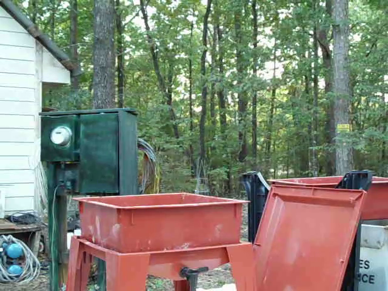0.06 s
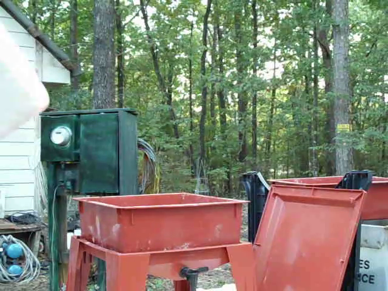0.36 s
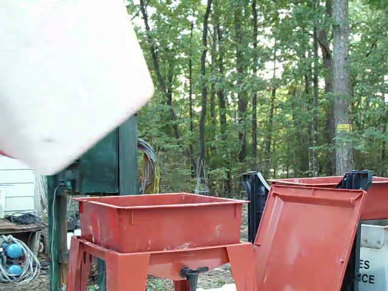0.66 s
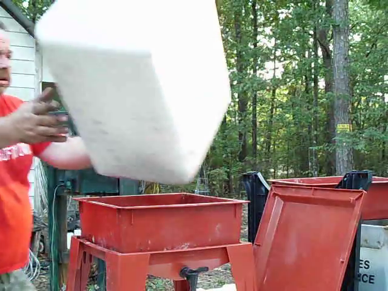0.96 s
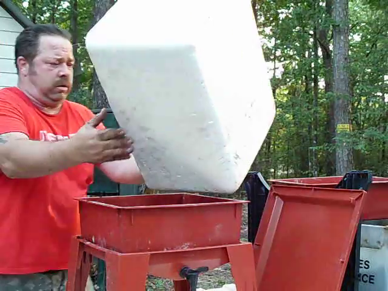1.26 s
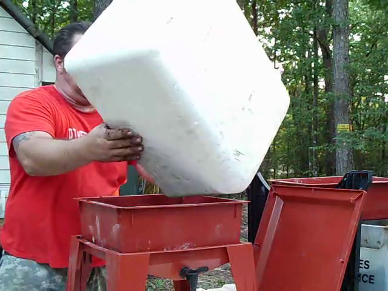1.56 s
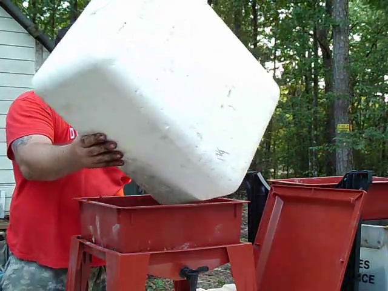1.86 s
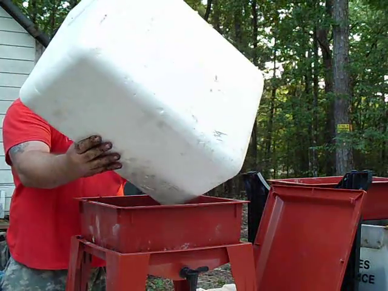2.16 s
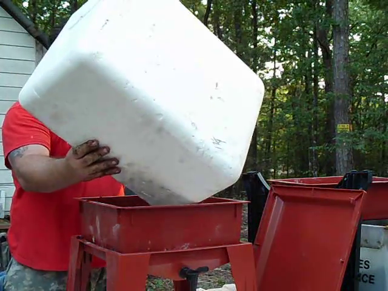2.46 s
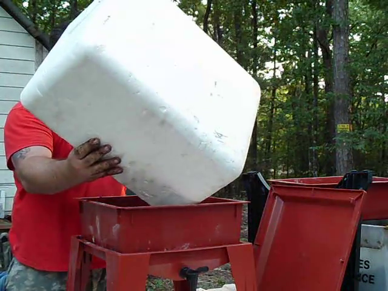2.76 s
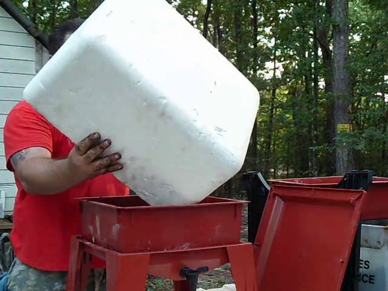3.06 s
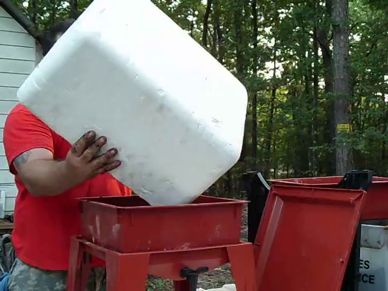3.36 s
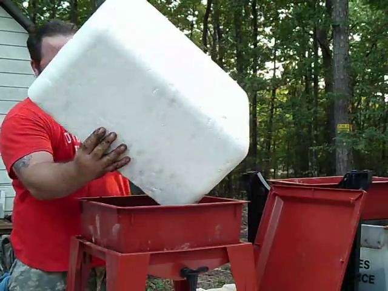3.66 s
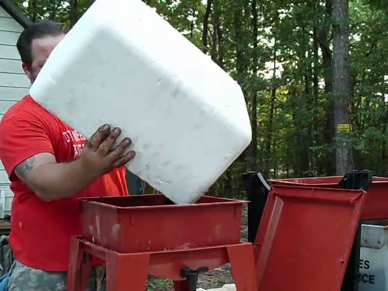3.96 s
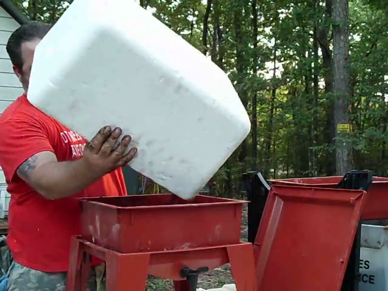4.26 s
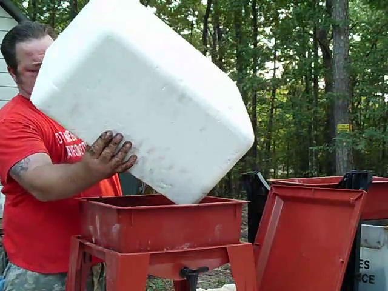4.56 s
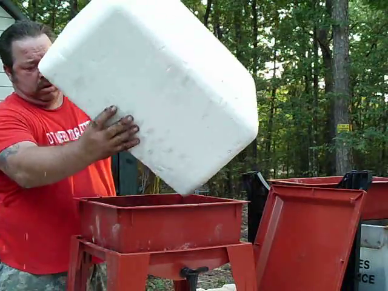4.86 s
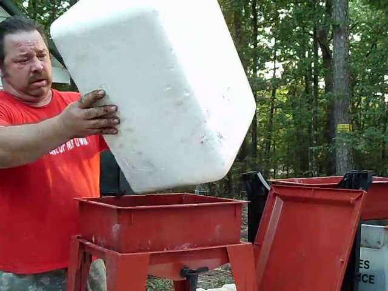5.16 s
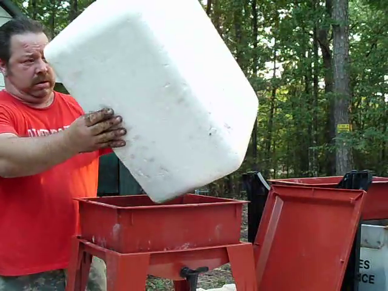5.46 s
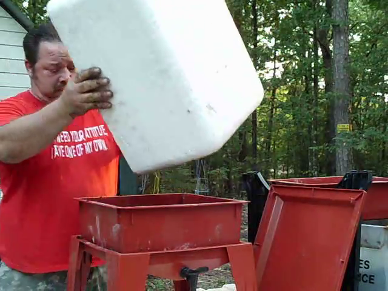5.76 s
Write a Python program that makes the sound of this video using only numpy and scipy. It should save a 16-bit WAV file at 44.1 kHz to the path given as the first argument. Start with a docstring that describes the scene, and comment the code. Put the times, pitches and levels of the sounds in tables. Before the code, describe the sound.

An empty foam cooler is handled with small ticks and scuffs, then thumps three times. After a short pause it is banged on a plastic tray's rim in a quick, even run, each blow hollow and slightly crunchy, ending with three harder hits. Leaves rustle, insects trill and a motor hums faintly in a wooded yard. The close microphone sounds a little dull and overloads on the hardest blows.

```python
"""Foam cooler on a plastic tray

In a wooded yard an empty foam cooler is caught in the hands, then banged upside down on a tray's rim.
Each blow booms in the hollow box while the foam crunches against the rim; between blows it ticks,
scuffs and squeaks under the fingers. Leaves rustle, insects sing in the trees and a motor hums.
A narrow-band microphone overloads on the hardest blows."""
import sys
import numpy as np
from scipy import signal
from scipy.fft import rfft, irfft, next_fast_len
from scipy.io import wavfile
from scipy.ndimage import map_coordinates

SR = 44100
rng = np.random.default_rng(int(sys.argv[2]) if len(sys.argv) > 2 else 0)


def store_pcm(level_fs):
    """Save levels as 16-bit WAV."""
    pcm = np.round(np.clip(level_fs, -1, 1) * 32767).astype(np.int16)
    wavfile.write(sys.argv[1], SR, np.atleast_2d(pcm).T)


N = 265390


def amp(db):
    """Decibels to gain."""
    return 10 ** (np.asarray(db) / 20)


def unit(x):
    """x at rms 1."""
    return x / np.sqrt(np.mean(x ** 2) + 1e-20)


def along(points, hz):
    """Read a curve of (Hz, value) points on a log frequency axis."""
    freqs, values = np.transpose(points)
    return np.interp(np.log(hz + 1), np.log(freqs + 1), values)


def wobble(rate):
    """A smooth random curve, rate knots a second."""
    return map_coordinates(rng.standard_normal(int(N * rate / SR) + 4), [np.arange(N) * rate / SR])


def coloured(x, gain_db):
    """x through the causal filter whose gain is gain_db(Hz)."""
    size = 2 * next_fast_len(len(x) // 2 + 4096)
    cepstrum = irfft(np.log(amp(gain_db(np.fft.rfftfreq(size, 1 / SR))) + 1e-6))
    cepstrum[1:size // 2] *= 2  # fold to minimum phase
    cepstrum[size // 2 + 1:] = 0
    return irfft(rfft(x, size) * np.exp(rfft(cepstrum)), size)[:len(x)]


def hump(centre_hz, octaves):
    """Gain in dB of one resonance with steep skirts."""
    return lambda hz: -20 * np.log10(1 + (np.log2((hz + 1) / centre_hz) / octaves) ** 2)


def noise(gain_db):
    """Steady noise of rms 1 with the spectrum gain_db(Hz)."""
    return unit(coloured(rng.standard_normal(N), gain_db))


def add(track, start_s, sound):
    """Mix a sound into the track."""
    part = track[max(round(start_s * SR), 0):][:len(sound)]
    part += sound[:len(part)]


# The colour of the leaf bed. Each row: frequency in Hz, relative level in dB.
RUSTLE_EQ = [(25, -2), (60, -14.5), (100, -8), (170, -6.5), (300, -11), (520, -8.5), (800, -6), (1200, -8),
             (2000, -8), (3500, -10.5), (5000, -20.5), (6500, -18)]
# The fader ride on the high hiss. Each row: time in seconds, level in dB.
HISS_RIDE = [(0, -48), (4.9, -48), (5.0, -55), (5.18, -62), (5.28, -47.5), (5.55, -48), (5.85, -55.5),
             (6.02, -50)]


def trees():
    """Leaves rustle evenly, under a high hiss that dips twice near the end."""
    rustle_db = -44 - wobble(1.2) + 0.21 * wobble(14)
    rustle = amp(rustle_db) * noise(lambda hz: along(RUSTLE_EQ, hz))
    hiss_db = np.interp(np.arange(N) / SR, *np.transpose(HISS_RIDE))
    return rustle + amp(hiss_db) * noise(hump(centre_hz=4530, octaves=.7))


# The lower insects swell together. Each row: peak time in seconds, level in dB,
# rise from half height in seconds.
CHORUS_SWELLS = [(.96, -46, .3), (5.42, -46, .14)]
# One nearer insect. Each row: midpoint in seconds, half-length in seconds, top rms in dB, pitch in Hz.
INSECT_NOTES = [(2.165, .2, -42.5, 2690), (4.352, .15, -47, 2645)]


def insects(swell_fall_s=0.16, trill_db=2.0):
    """Two bands of trilling insects, the lower in swells, and the thin notes of a nearer one."""
    out, t = np.zeros(N), np.arange(N) / SR
    low_gain = amp(-58)
    for peak, db, rise in CHORUS_SWELLS:
        half_width = np.where(t < peak, rise, swell_fall_s)
        low_gain += amp(db) / (1 + ((t - peak) / half_width) ** 2)
    high_gain = amp(-52 - 0.4 * wobble(3.5))
    for gain, band in ((low_gain, hump(2347, octaves=0.14)), (high_gain, hump(2724, octaves=0.077))):
        out += gain * amp(trill_db * wobble(30)) * noise(band)
    for middle, half, db, hz in INSECT_NOTES:
        size = int(2 * half * SR)
        phase = 2 * np.pi * np.cumsum(hz * (1 + 0.0039 * wobble(99)[:size])) / SR
        add(out, middle - half, amp(db) * np.sqrt(2) * np.sin(phase) * np.hanning(size))
    return out


# The motor's drone. Each row: frequency in Hz, rms level in dB.
MOTOR_PARTIALS = [(59.2, -60.5), (118.4, -53.5), (139, -63.5), (236.9, -65), (257, -66.5), (286, -67),
                  (452, -63.5)]


def motor():
    """A steady hum whose partials waver together in pitch and level."""
    shaft_time = np.arange(N) / SR + 0.00018 * wobble(2.6)
    hum = sum(amp(db) * np.sqrt(2) * np.sin(2 * np.pi * hz * shaft_time) for hz, db in MOTOR_PARTIALS)
    return amp(0.93 * wobble(5.4)) * hum


def slips(size, spread):
    """Stick-slip of foam beads: a dense run of tiny jerks, more unequal as spread grows."""
    jerks, strength = rng.standard_normal((2, size))
    return unit(jerks * np.exp(spread * np.clip(strength, -3, 3)))


# The clearest catches. Each row: start in seconds, level in dB, centre in Hz, width in octaves.
FOAM_TICKS = [(.015, -27.5, 3500, 1.1), (.289, -28.5, 2300, 2.1), (1.081, -32, 3800, 0.74),
              (1.156, -34, 4000, .64), (1.404, -18.5, 1600, 1.1), (1.621, -31, 1410, .8),
              (1.677, -31.5, 2180, 1.4), (1.735, -30, 3650, 2), (2.156, -31, 2080, 0.46),
              (2.394, -25, 1430, 0.66), (3.046, -24.5, 2300, 0.91)]


def ticks(faint_count=14, handling_from_s=1.3, handling_to_s=4.85, t60=0.041):
    """Foam catches on fingers and rim in dry snaps; faint ones fall at random as the box is worked."""
    out, t = np.zeros(N), np.arange(SR // 8) / SR
    faint = []
    for when, weakness, pitch in rng.random((faint_count, 3)):
        start = handling_from_s + when * (handling_to_s - handling_from_s)
        faint.append((start, -35 - 9 * weakness, 2700 * 2 ** (pitch - .5), 1))
    for start, db, hz, octaves in FOAM_TICKS + faint:
        snap = coloured(slips(len(t), spread=0.12) * amp(-60 * t / t60), hump(hz, octaves))
        add(out, start, amp(db) * snap / np.linalg.norm(snap) * np.sqrt(0.0071 * SR))
    return out


# The slides. Each row: midpoint in seconds, half-length in seconds, level in dB, centre in Hz.
FOAM_SCUFFS = [(0.14, 0.037, -39.5, 670), (.29, .11, -40, 1100), (0.454, .05, -31, 1350),
               (0.723, 0.064, -35.5, 5050), (1.024, .034, -25.5, 3570), (1.358, 0.048, -34, 1600),
               (1.53, .04, -25.5, 1400), (1.601, .05, -33, 1400), (1.754, .08, -32, 2500),
               (3.677, .046, -36.5, 1610), (4.092, 0.023, -35, 1200), (4.146, .0045, -26, 3000),
               (4.799, 0.17, -39.5, 2400)]


def scuffs(settle_half_s=0.098, settle_db=-30.5, settle_hz=1800):
    """Sliding foam swells and fades in a gritty rasp; after each blow it grinds softly on the rim."""
    out = np.zeros(N)
    settling = [(start + settle_half_s, settle_half_s, force_db + settle_db, settle_hz)
                for start, force_db, *_ in BOX_BLOWS]
    for middle, half, db, hz in FOAM_SCUFFS + settling:
        size = int(2 * half * SR)
        grit = coloured(slips(size, spread=0.86), hump(hz, octaves=1.58))
        rasp = unit(grit * amp(2.9 * wobble(170)[:size]))
        add(out, middle - half, amp(db) * rasp * np.hanning(size))
    return out


# The body of the box on the tray. Each row: frequency in Hz, relative level in dB,
# t60 in seconds before the grip damps it.
BOX_MODES = [(165.3, 1, 0.25), (210.4, -14.5, 0.15), (228, 0, 0.13), (250, 1, 0.14), (292.5, -14, 0.3),
             (337.7, -3, 0.13), (373.5, 4, 0.16), (456.3, -4, 0.17), (500.4, -2.5, 0.17), (626.5, -7, 0.15),
             (730, -1, 0.091), (789, -7.5, 0.15), (835, -8.5, 0.16), (934, -25.5, 0.16), (1067, -4, 0.067),
             (1069, -6.5, 0.083), (1264, -10, 0.145), (1470, -4, 0.081), (1816, -1.5, 0.091)]


def box_ring(t, boom_db, thump_db, knock_db=-2.5, attack_s=0.0076):
    """Where the box is struck decides which of its modes ring most; the grip damps them."""
    hz, mode_db, t60 = np.transpose(BOX_MODES)[:, :, None]
    strike_eq = [(170, boom_db), (200, thump_db), (290, thump_db),
                 (330, knock_db), (560, knock_db), (700, 0)]
    ring_share = 0.83 - 0.0306 * thump_db  # a flat blow on a wall damps it more
    detune, side, scatter = rng.standard_normal((3, len(BOX_MODES), 1))
    panel = hz > 400
    pitch = hz * (1 + np.where(panel, .014, .008) * detune)  # the grip detunes the walls a little
    sign = np.where(panel, np.sign(side), 1)  # panel modes are hit on either side of a node
    level_db = along(strike_eq, hz) + mode_db + np.where(panel, 2, .5) * scatter
    modes = sign * amp(level_db - 60 * t / (t60 * ring_share)) * np.sin(2 * np.pi * pitch * t)
    return modes.sum(0) * (1 - np.exp(-t / attack_s))


def burst(t, jerks, t60, eq, span_s):
    """Each jerk (seconds, size) snaps and wakes a dense ring; total energy is that of rms 1 for span_s."""
    fade = amp(-60 * t / t60) + 1.15 * amp(-60 * t / 0.0092)
    x = np.zeros(len(t))
    for delay, size in jerks:
        add(x, delay, size * fade * rng.standard_normal(len(t)))
    x = coloured(x, lambda hz: along(eq, hz))
    return x / np.linalg.norm(x) * np.sqrt(span_s * SR)


# The colours of four layers of a hit. Each row: frequency in Hz, relative level in dB.
CRACK_EQ = [(200, -10.5), (700, -10), (2500, -2), (4000, 1.5), (6500, -16)]  # first contact
CLACK_EQ = [(150, -19.5), (330, -9), (480, 2.5), (575, -5.5), (700, -3), (860, 3.5), (1050, 1),
            (1170, -4.5), (1300, 0), (1800, -4.5), (2300, -9.5), (4000, -36.5)]  # dense panel modes
CRUNCH_EQ = [(800, -64), (1600, 1), (2200, 0.5), (3000, 2), (4000, -2.5), (5000, -8), (6500, -11)]  # crushed beads
SHOVE_EQ = [(25, -13.5), (50, -18), (85, -3.5), (130, 7), (200, -13), (400, -48)]  # air pushed by the whole box
# The hits. Each row: start in seconds, force in dB, cavity boom trim in dB, wall thump trim in dB,
# pitch of the struck wall in Hz, rough crushing time in seconds.
BOX_BLOWS = [(1.023, -22.5, -7.5, 9.5, 228, 0.0099), (1.238, -20.5, -15, 10.5, 227, 0.0055),
             (1.4121, -15.5, -11, 8, 337, .002), (2.024, -25, -11.5, -1, 241, 0.0029),
             (2.239, -14, -10, -5.5, 246, .014), (2.445, -15.5, -11, -2, 222, .0015),
             (2.636, -16, -10.5, -2, 240, .008), (2.819, -14.5, -8, -3.5, 220, .002),
             (3.015, -19, -9, -8, 230, 0.0028), (3.235, -15, -3, -1.5, 240, 0.0047),
             (3.4409, -15.5, -4.5, -0.5, 220, .004), (3.645, -39.5, -7, 1, 227, 0.0036),
             (3.890, -11.5, 2.5, 1.5, 208.7, .006), (4.149, -12.5, -11, 0.5, 250.5, 0.0031),
             (4.401, -12, -2, -6, 246, 0.0052), (4.571, -39, -4, -4, 230, 0.0042),
             (4.72, -43.5, -7, 12, 238, 0.0088)]


def blows():
    """The foam cracks on the rim, then gives way in jerks as the box rings; force drives every layer."""
    out, t = np.zeros(N), np.arange(SR // 4) / SR
    contact = coloured(np.where(t == 0, 1., 0.), lambda hz: along(CRACK_EQ, hz))
    contact /= np.abs(contact).max()
    for start, force_db, boom_db, thump_db, wall_hz, crush_s in BOX_BLOWS:
        ring = box_ring(t, boom_db, thump_db)
        # the struck wall flexes for a few cycles and the foam soaks the motion up
        flex = amp(thump_db - 0.5) * np.sin(2 * np.pi * wall_hz * t) * np.exp(-((t - .008) / .0064) ** 2)
        delays = crush_s * (np.arange(3) + rng.uniform(.4, 1.2, 3)) / 3
        jerks = [(0, 0.92)] + [(delay, .8) for delay in delays]
        clack = burst(t, jerks, t60=0.084, eq=CLACK_EQ, span_s=0.014)
        crunch = amp(-2 + 0.8 * force_db) * burst(t, jerks, t60=0.069, eq=CRUNCH_EQ, span_s=0.015)
        shove = amp(boom_db - 11) * burst(t, [(0.011, 1)], t60=0.19, eq=SHOVE_EQ, span_s=0.0063)
        crack = amp(22.5 - 1201.5 * crush_s) * contact  # a longer crush softens the attack
        add(out, start, amp(force_db) * (ring + flex + clack + crack + shove) + crunch)
    return out


# The foam sticks and squeaks. Each row: midpoint in seconds, half-length in seconds, level in dB,
# centre in Hz, width in octaves.
FOAM_SQUEAKS = [(1.375, 0.0098, -26, 3570, 0.47), (1.554, .012, -29, 3480, 0.57),
                (1.887, 0.0027, -26, 4220, .15), (3.382, 0.009, -38, 3600, 0.9)]


def squeaks():
    """Very short slides whose jerks gather around one pitch."""
    out = np.zeros(N)
    for middle, half, db, hz, octaves in FOAM_SQUEAKS:
        size = int(2 * half * SR)
        squeal = coloured(slips(size, spread=0.28), hump(hz, octaves))
        add(out, middle - half, amp(db) * unit(squeal * np.hanning(size)))
    return out


# The outdoor reverb. Each row: frequency in Hz, t60 in seconds.
YARD_DECAY = [(150, 0.33), (250, 0.27), (500, 0.17), (2000, 0.25), (6000, 0.246)]


def yard(x, predelay_s=.014):
    """House wall and trunks scatter a short tail, which changes as the box moves."""
    out, block = np.zeros(N), SR // 3
    for start in range(0, N, block):
        hz, t, bands = signal.stft(rng.standard_normal(SR // 2), SR, nperseg=256)
        fade = amp(-60 * t / along(YARD_DECAY, hz)[:, None])
        _, tail = signal.istft(bands * fade, SR, nperseg=256)
        wet = signal.fftconvolve(x[start:start + block], tail / np.linalg.norm(tail))
        add(out, start / SR + predelay_s, wet)
    return out


def scene():
    """The box up close over the outdoor bed; its other faces send each blow differently into the yard."""
    handling = ticks() + scuffs() + squeaks()
    close = blows() + handling
    reverb = amp(-13) * yard(blows() + handling)
    return (close + reverb + trees() + insects() + motor())[None]


# The microphone's tone. Each row: frequency in Hz, gain in dB.
MIC_EQ = [(20, -9.5), (100, 1), (4400, -3), (5200, -5), (5700, -16), (6100, -30), (6600, -64.5),
          (8000, -65.5)]


def record(dry, offset=.011, ceiling=.72, top_hz=16600):
    """A narrow-band microphone whose loudest peaks are clipped, on a converter with a small offset."""
    narrow = coloured(dry[0], lambda hz: along(MIC_EQ, hz))
    clipped = np.clip(narrow + offset, -ceiling, ceiling)
    high_cut = 1 / (1 + (np.fft.rfftfreq(N, 1 / SR) / top_hz) ** 120)
    return irfft(rfft(clipped) * high_cut, N)[None]


dry = scene()
out = record(dry)
store_pcm(out)
```